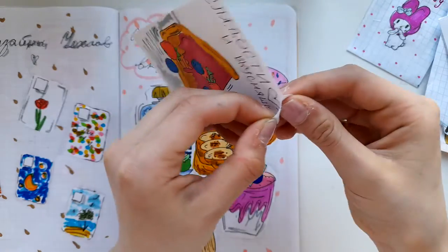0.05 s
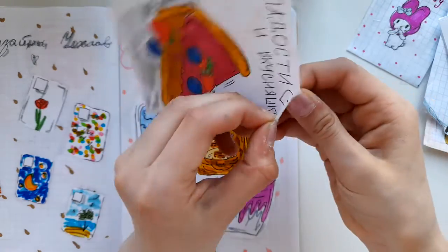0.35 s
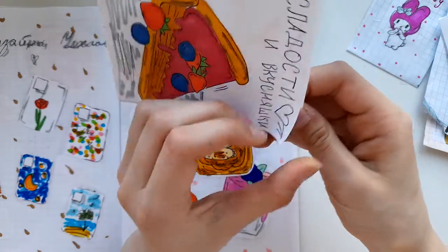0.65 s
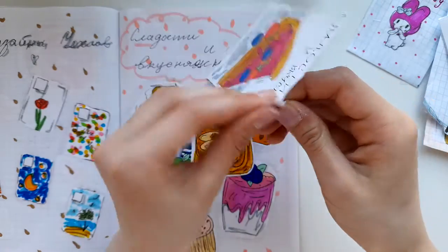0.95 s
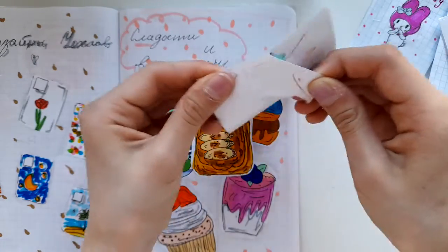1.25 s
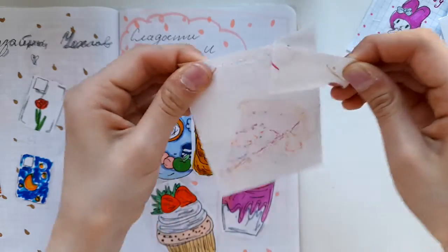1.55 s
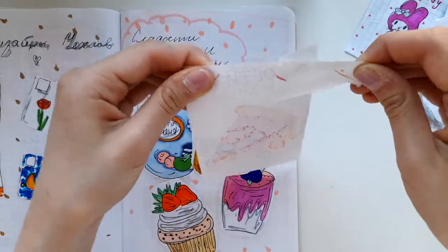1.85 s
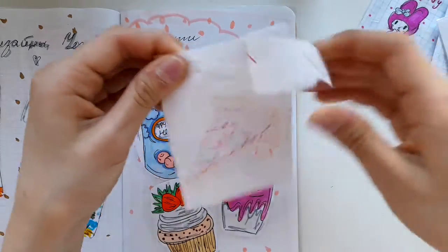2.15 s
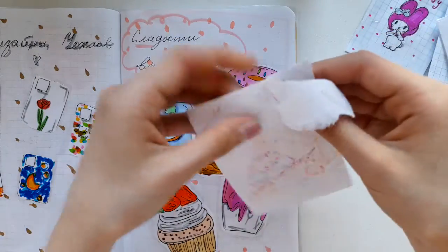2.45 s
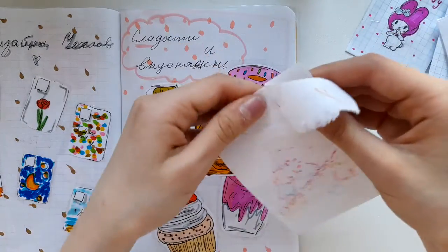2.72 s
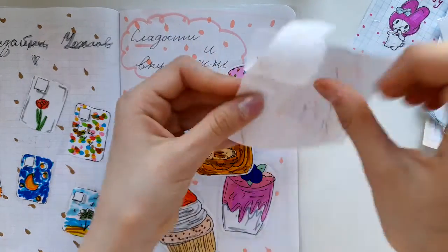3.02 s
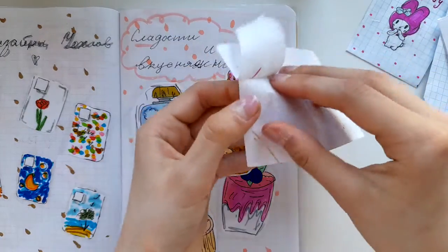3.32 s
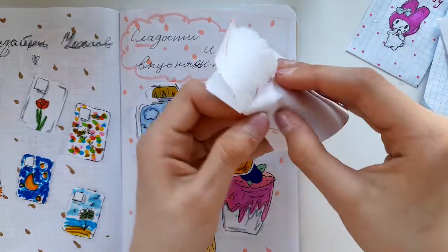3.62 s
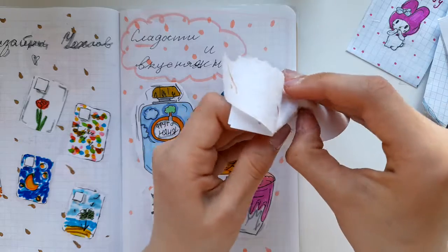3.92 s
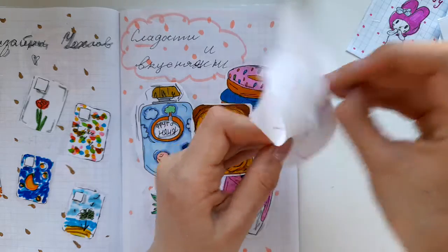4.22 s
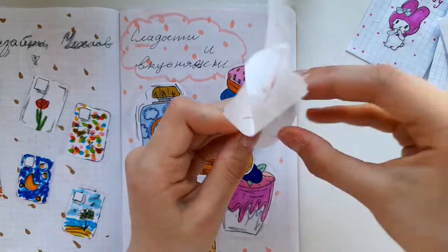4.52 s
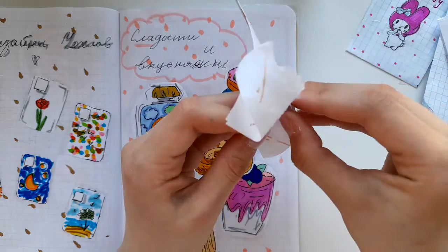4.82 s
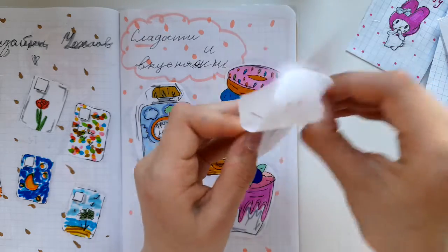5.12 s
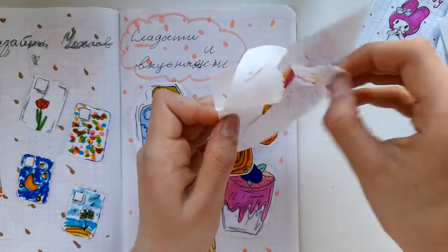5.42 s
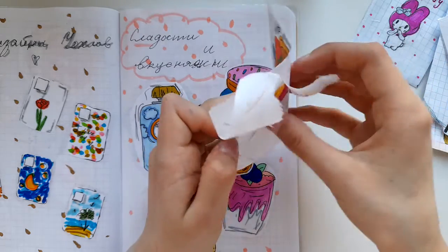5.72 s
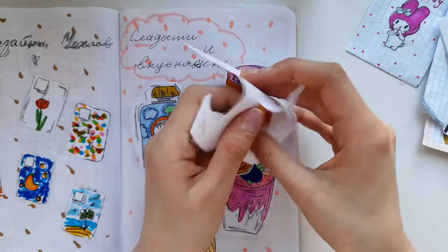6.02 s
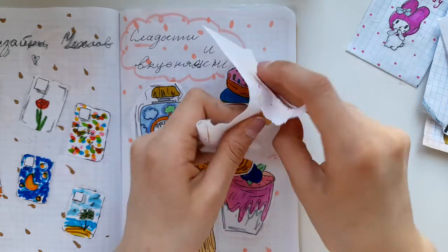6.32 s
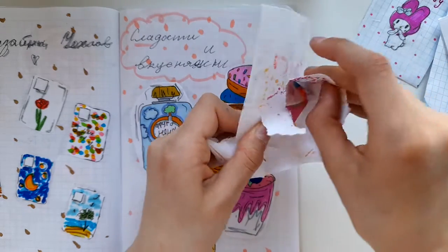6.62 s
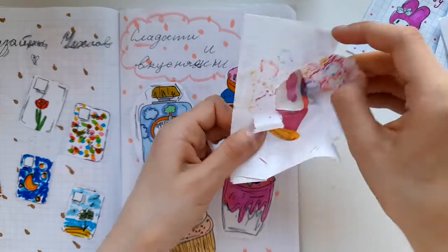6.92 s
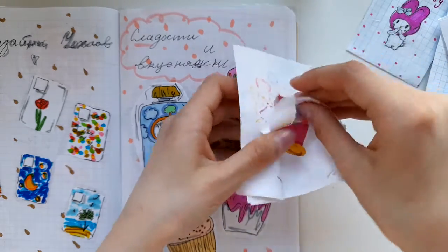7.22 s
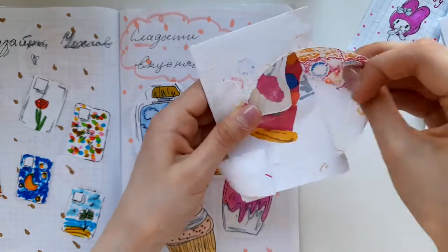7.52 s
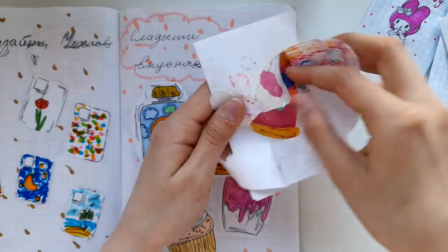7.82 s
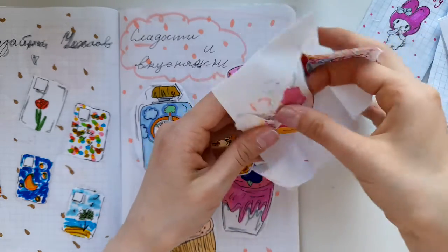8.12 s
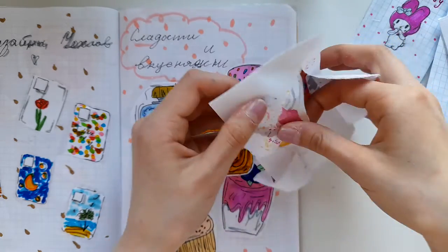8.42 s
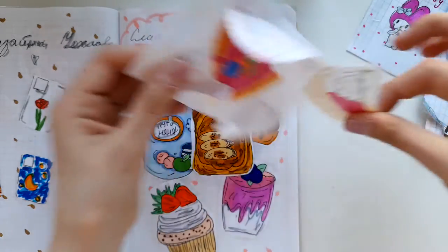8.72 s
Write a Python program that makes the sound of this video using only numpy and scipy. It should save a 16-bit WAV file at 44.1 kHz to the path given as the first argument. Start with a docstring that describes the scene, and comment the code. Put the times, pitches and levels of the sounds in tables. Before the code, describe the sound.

Thin paper is torn open by hand, close to the microphone in a small, quiet room. Light rubbing and a small rip at about 0.4 seconds lead into a run of crisp, bright rips from 1 to 1.5 seconds, trailing off in little tears and ticks by 2 seconds. From 2 to 5 seconds the paper is handled more quietly, with finger rubs, scattered crease snaps and small pops, and soft bumps on the desk around 4.2 and 4.7 seconds. A sharp rip comes just after 5 seconds, followed by light rustling. From 6.5 to 7 seconds several short tears mix with scrapes and crackling creases. Another rip sounds at 7.5 seconds and a sharp snap near 7.9. Rubbing and crinkling continue to about 8.8 seconds, ending with a faint desk bump.

```python
"""A folded paper packet is torn open by two hands over a desk, close to a phone in a small room.
Each rip is a run of breaking fibres. In between, fingers and layers rub, dragged edges scrape,
single fibres tick, creases buckle with sharp snaps and curved panels pop inside out.
Rips, rubs and snaps ring the same sheet in three colours: bright hiss, ringing folds and low body.
Underneath, loose flaps push air and now and then a hand bumps the desk."""
import sys
import numpy as np
from scipy import signal
from scipy.fft import rfft, irfft
from scipy.io import wavfile
from scipy.ndimage import uniform_filter1d

SR = 44100
rng = np.random.default_rng(int(sys.argv[2]) if len(sys.argv) > 2 else 0)


def generate_wav(signal):
    """Clip the signal to [-1, 1] and save it as 16-bit WAV at the path in sys.argv[1]."""
    frames = np.transpose(np.atleast_2d(signal))
    scaled = np.clip(frames, -1, 1) * 32767
    pcm = np.round(scaled).astype(np.int16)
    wavfile.write(sys.argv[1], SR, pcm)


N = 390680
TIME = np.arange(N) / SR

# The three colours of the paper, each a spectrum: f/Hz, level/dB
HISS_SPECTRUM = [(4500, -14.5), (6500, -11), (8300, -6), (9700, -1.5), (11500, -3), (14500, -5),
                 (16000, -25), (18000, -31)]
FOLDS_SPECTRUM = [(2000, -25), (2900, -2.5), (3500, 3), (4700, 2), (6300, -1), (8000, -14.5)]
BODY_SPECTRUM = [(50, -30), (150, -12), (650, -10), (880, -3), (1250, 1.5), (1550, -2.5), (1880, -7),
                 (2200, -0.5), (2800, -10), (4000, -25)]
# The quiet of the room: f/Hz, level/dB
ROOM_TONE_SPECTRUM = [(25, -26.5), (60, -0.5), (200, -1), (500, -6.5), (1500, -35), (16000, -24)]

# Cue levels are set ahead of the mix; folds and body are relative to the hiss.
# The grip on the packet, which never quite stops sliding: t/s, hiss/dB, body/dB
GRIP = [(0, -60.5, -9), (.3, -63, -16), (.6, -68, -12.5), (1.6, -66, 1), (2.1, -71.5, -14.5),
        (3.08, -64.5, -23), (3.3, -59.5, -10), (3.799, -61, -8), (3.94, -71, -21.5), (4.451, -87, -10),
        (4.72, -61.5, -7.5), (5.1, -54, -15), (5.43, -73.5, -7), (5.8, -58, -8.5), (7.4, -50, -7),
        (7.66, -62, -2.5), (8.05, -56.5, -3), (8.45, -52.5, -9), (8.56, -63.5, -5)]
# Strokes of a finger or a layer over the sheet: t/s, length/s, hiss/dB, body/dB
RUBS = [(0.06, 0.053, -72, 14), (0.256, 0.14, -52.5, -18), (0.922, 0.18, -50.5, -42),
        (1.733, 0.06, -53.5, -18.5), (1.955, 0.072, -50, -23.5), (2.145, 0.097, -57.5, -7),
        (2.226, 0.11, -48, -17), (2.348, 0.13, -47.5, -11.5), (2.477, 0.095, -53, -8.5),
        (2.596, 0.055, -50.5, -16), (2.725, 0.18, -53.5, -17), (2.85, 0.15, -52.5, -13.5),
        (3.123, 0.16, -54.5, -9.5), (3.3, 0.14, -56.5, -9), (3.646, 0.099, -51.5, -7.5),
        (3.993, 0.097, -53, -11), (4.131, 0.037, -50.5, -10), (4.177, 0.046, -49, -4.5),
        (4.5, 0.054, -67, -3), (4.639, 0.13, -70.5, 11), (4.896, 0.014, -43, -16), (5.647, 0.019, -48, -15),
        (5.67, 0.18, -55.5, -6.5), (5.805, 0.15, -47, -10.5), (6.079, 0.087, -51, -9),
        (6.22, 0.074, -48, -5.5), (6.362, 0.061, -45.5, -19), (6.838, 0.063, -44.5, -3),
        (6.99, 0.058, -47.5, -4), (7.712, 0.18, -52, -6), (8.012, 0.19, -47.5, -5),
        (8.38, 0.019, -43.5, -7.5), (8.619, 0.12, -45.5, -12)]
# An edge or fingertip dragged over a flap: t/s, length/s, first f/Hz, last f/Hz, level/dB
SCRAPES = [(0.07, .08, 1600, 900, -64), (1.005, 0.2, 1200, 1300, -60.5), (1.215, 0.098, 1350, 1249, -48),
           (1.426, 0.07, 1350, 1240, -46), (1.443, .05, 4400, 4100, -38), (2.245, 0.055, 563, 560, -59),
           (4.557, 0.15, 1850, 1680, -68.5), (5.151, .055, 9600, 10100, -31),
           (6.486, 0.12, 1200, 1508, -48), (6.53, 0.063, 3700, 3930, -32), (6.746, .088, 4900, 3196, -32.5),
           (7.013, 0.15, 1350, 1263, -69), (7.224, .17, 1450, 1310, -62), (7.491, 0.072, 1250, 1193, -44),
           (7.797, .06, 1450, 1300, -54), (7.971, 0.22, 1300, 1210, -63.5), (8.683, 0.084, 922, 926, -64.5)]
# Hands bumping the desk: t/s, level/dB, decay/s
BUMPS = [(.085, -59, 0.07), (4.215, -45, 0.046), (4.68, -48.5, 0.073), (5.235, -56, 0.048),
         (8.783, -47, 0.035)]
# Resonances of the desk top: f/Hz, width/Hz, level/dB
DESK_MODES = [(97.2, 6.9, 2), (144, 31, -1), (260, 16.4, -1.5), (528, 65, -10)]
# Single stiff fibres letting go: t/s, hiss/dB
TICKS = [(.231, -49.5), (.325, -48), (.3713, -31.5), (.459, -49), (.859, -44), (.8912, -42.5),
         (.9167, -37.5), (1.0258, -32), (1.182, -34), (1.2003, -23.5), (1.249, -22), (1.6307, -40),
         (1.652, -39), (1.713, -37.5), (1.831, -34), (1.928, -38), (3.896, -48.5), (4.084, -41),
         (4.138, -42.5), (4.792, -43.5), (4.8977, -40.5), (4.923, -47), (4.991, -45.5), (5.0473, -41),
         (5.0555, -41), (5.078, -46), (5.1155, -41), (5.1197, -28), (6.4585, -35.5), (6.473, -35)]
# Rips, one for each pull: t/s, rise/s, hold/s, hiss/dB, folds/dB, body/dB
RIPS = [(0.346, 0.033, 0.034, -31.5, -9, -20), (0.471, 0.0096, 0.0053, -35, -10, -13.5),
        (1.02, 0.071, 0.022, -27, -15, -29), (1.122, 0.014, 0.088, -35, -11, -23),
        (1.189, 0.057, 0.046, -21, -7.5, -18.5), (1.39, 0.018, 0.021, -33.5, -6, -8.5),
        (1.419, 0.024, 0.036, -20.5, -9.5, -16), (1.646, 0.024, 0.052, -40, -13.5, -15.5),
        (1.817, 0.0098, 0.011, -33.5, -12, -15.5), (1.907, 0.022, 0.017, -39, -13.5, -16),
        (5.097, 0.021, .02, -37, -3, -11), (5.139, 0.0032, 0.075, -19, -8, -15.5),
        (5.204, 0.023, 0.043, -25, -9, -16.5), (6.48, 0.016, 0.085, -32.5, -8.5, -20.5),
        (6.52, 0.033, 0.029, -25, -4, -10), (6.634, 0.014, 0.0086, -37, 0.5, -4),
        (6.686, 0.013, 0.013, -26.5, 1.5, -8), (6.734, 0.013, 0.008, -29, -1.5, -5.5),
        (6.774, 0.023, 0.028, -27, -5, -8), (6.893, 0.02, 0.025, -30.5, -0.5, -4.5),
        (7.453, 0.0086, 0.03, -33.5, -4.5, -8), (7.484, 0.028, 0.022, -19, -6.5, -8.5)]
# The loose sheet flapping: t/s, level/dB, decay/s
FLAPS = [(.425, -62, 0.21), (1.27, -57, 0.079), (1.44, -47.5, 0.1), (1.484, -41.5, 0.017),
         (2.32, -60, 0.06), (2.386, -57, 0.033), (3.166, -50, 0.023), (3.211, -56, 0.035),
         (5.146, -50.5, 0.17), (5.244, -51, 0.045), (6.55, -56.5, 0.084), (7.515, -49, 0.06)]
# The puff of air from a flap: f/Hz, level/dB
PUFF_SPECTRUM = [(40, -27.5), (110, -10), (170, -5), (290, -9.5), (560, -13), (1500, -22)]
# Creases buckling and edges giving way: t/s, hiss/dB, folds/dB, body/dB, flip time/s
SNAPS = [(1.5, -19, -9, -19, 0.0022), (2.163, -42, -5, -10, 0.0062), (2.319, -35.5, -8, -13, 0.0044),
         (3.166, -45.5, 9.5, 8, 0.0017), (3.1713, -51, 4, 12, 0.00061),
         (3.2119, -53.5, 15.5, 15.5, 0.00035), (4.2187, -28, -3, -5, .002), (5.022, -34, -6.5, -15, 0.0023),
         (5.103, -33.5, -6, -19, 0.0028), (5.1412, -21, -3.5, -6.5, 0.0061),
         (5.249, -26, -12, -3.5, 0.0024), (5.57, -47, 2, 1, .002), (6.0746, -48, -6, 0.5, .001),
         (6.156, -40.5, -1, -14, .002), (6.513, -25, -5.5, -6, .003), (6.537, -20, -8, -7.5, .004),
         (6.6903, -27.5, -3, -9.5, 0.0024), (6.9107, -20, -2, -18, 0.0024), (6.9182, -26, -2, -10, 0.0016),
         (7.3073, -24.5, -7, -16.5, 0.00048), (7.399, -35.5, -1.5, -4, 0.00097),
         (7.457, -33, -8, -10, 0.0016), (7.4884, -25, -14, -9, 0.0025), (7.559, -20.5, -6, 3.5, 0.00085),
         (7.8603, -15.5, -2.5, -8, 0.00057), (8.2415, -43.5, 4, -21, 0.00036), (8.263, -42, 1, -32, .0005),
         (8.3275, -39, 2, 1, 0.0014), (8.695, -30.5, -6, -13.5, 0.0047), (8.738, -36, -0.5, 0, 0.0038)]
# Curved panels popping inside out, lower when larger: t/s, f/Hz, level/dB
POPS = [(2.239, 1130, -55), (2.251, 920, -44.5), (2.387, 1550, -39.5), (2.8652, 1320, -44.5),
        (3.597, 875, -44), (3.653, 905, -48.5), (5.539, 1220, -45.5), (5.598, 1280, -50),
        (5.745, 1550, -41), (5.961, 1330, -43), (6.315, 3330, -39), (6.3411, 2660, -30.5),
        (7.8595, 1600, -23.5), (8.478, 1300, -44)]
# Spectrum of a popping panel: multiple of its pitch, level/dB
PANEL_SPECTRUM = [(.25, -24.5), (.55, -10), (1, 1), (1.75, -11), (3, -17), (9, -31)]


def undb(db):
    """Decibels to gain."""
    return 10 ** (np.asarray(db) / 20)


def unit(x):
    """Scale to rms 1."""
    return x / np.sqrt(np.mean(x ** 2))


def add(out, start, sound):
    """Mix a sound in at a start time in seconds."""
    i = max(int(start * SR), 0)
    out[..., i:i + sound.shape[-1]] += sound[..., :N - i]


def response(points, size=1024):
    """Minimum-phase impulse response of unit energy from a spectrum of (f/Hz, level/dB) points."""
    hz, db = np.transpose(points)
    log_hz = np.log(np.arange(size // 2 + 1) * SR / size + 1)
    curve_db = np.interp(log_hz, np.log(hz), db, left=db[0] - 21.5, right=db[-1] - 13.5)
    cepstrum = irfft(np.log(undb(curve_db)))
    cepstrum[1:size // 2] *= 2
    cepstrum[size // 2 + 1:] = 0
    impulse = irfft(np.exp(rfft(cepstrum)))
    return impulse[None] / np.linalg.norm(impulse)


def ring(x, impulse):
    """Pass two channels through an impulse response."""
    return signal.oaconvolve(x, impulse, axes=1)[:, :x.shape[1]]


def stereo_noise(size, likeness):
    """White noise whose left and right correlate by likeness."""
    noise = rng.standard_normal((3, size))
    return np.sqrt(likeness) * noise[0] + np.sqrt(1 - likeness) * noise[1:]


def burst(envelope, impulse, likeness, db, length_s=0.0027):
    """A short noise hit through a response; db is its rms if packed into length_s."""
    hit = ring(stereo_noise(len(envelope), likeness) * envelope, impulse)
    return unit(hit) * undb(db) * np.sqrt(length_s * SR / len(envelope))


def wobble(t, rate):
    """Random values, rate of them a second, joined by straight lines."""
    values = rng.standard_normal(len(t))
    return np.interp((t - t[0]) * rate, np.arange(len(t)), values)


def gesture_db(t, rise_s, hold_s, sag_db_per_s, release_db_per_s):
    """Envelope of one hand movement: it gathers speed, sags while it lasts and dies away."""
    speed = np.clip(t / rise_s, .001, 1)
    sag_db = sag_db_per_s * np.clip(t - rise_s, 0, hold_s)
    release_db = release_db_per_s * np.maximum(t - rise_s - hold_s, 0)
    return 20 * np.log10(speed) - sag_db - release_db


def crackle(rate, spread_db, grain_s, smooth, even_s):
    """Envelope of tiny slips at random moments, few large and many small, over a smooth share."""
    size = len(rate)
    slips = rng.random(size) < rate / SR
    strength = undb(spread_db * np.minimum(rng.exponential(size=size), 5))
    energy = signal.lfilter([1], [1, -np.exp(-1 / (grain_s * SR))], slips * strength ** 2)
    # the hands feed in energy steadily, however it is shared among the slips
    energy /= np.abs(uniform_filter1d(energy, int(even_s * SR))) + 1e-6
    return np.sqrt(smooth + (1 - smooth) * energy)


def morph(x, new_response, shape_s=.07):
    """Pass a sound through a response that crossfades into a new shape every shape_s."""
    hop = int(shape_s * SR)
    fade = signal.get_window("hann", 2 * hop)
    padded = np.pad(x, ((0, 0), (hop, 3 * hop)))
    out = np.zeros((2, padded.shape[1] + SR))
    for i in range(0, x.shape[1] + hop, hop):
        part = signal.fftconvolve(padded[:, i:i + 2 * hop] * fade, new_response(), axes=1)
        out[:, i:i + part.shape[1]] += part
    return out[:, hop:hop + x.shape[1]]


def sheet():
    """Each colour as (spectrum, detune spread/semitones, likeness): lows reach both sides alike."""
    return [(HISS_SPECTRUM, .3, .25), (FOLDS_SPECTRUM, 1.38, .35), (BODY_SPECTRUM, 0.13, .88)]


def bent(spectrum, semitones):
    """Response of one colour of the sheet, detuned at random by bending."""
    stretch = 2 ** (semitones * rng.standard_normal() / 12)
    return response([(hz * stretch, db) for hz, db in spectrum])


def drive_sheet(envelopes_db, t, grains, paper, jerk_db, jerk_rate):
    """Grains ring hiss, folds and body; the hands move in jerks and the sheet keeps changing shape."""
    hiss_db, folds_db, body_db = (db + jerk_db * wobble(t, jerk_rate) for db in envelopes_db)
    levels_db = hiss_db, hiss_db + folds_db, hiss_db + body_db
    out = np.zeros((2, len(t)))
    for db, (spectrum, semitones, likeness) in zip(levels_db, paper):
        friction = stereo_noise(len(t), likeness) * grains * undb(db)
        out += morph(friction, lambda: bent(spectrum, semitones))
    return out


def thuds(cues, impulse, rise_share, size):
    """Soft pushes through a low response; the longer a push lasts, the more gently it swells."""
    out, t = np.zeros((2, N)), np.arange(size) / SR
    for start, db, decay_s in cues:
        attack = 1 - np.exp(-t / (rise_share * decay_s))
        decay = np.exp(-.5 * (t / decay_s) ** 2) * (1 - t / t[-1])
        thud = ring(stereo_noise(size, 0.83) * attack * decay, impulse)
        add(out, start, unit(thud) * undb(db) * np.sqrt(decay_s * SR / size))
    return out


def room_tone(level_db=-77):
    """The quiet of the room: a faint, steady bed of low noise."""
    return undb(level_db) * ring(stereo_noise(N, 0.53), response(ROOM_TONE_SPECTRUM, size=4096))


def rub_envelopes(rise_share=0.55):
    """Hiss/dB and relative body/dB of the sliding grip and all the strokes together."""
    times, *columns = np.transpose(GRIP)
    grip_db, grip_body_db = (np.interp(TIME, times, column) for column in columns)
    power = undb([grip_db, grip_db + grip_body_db]) ** 2
    t = TIME[:SR // 2]
    for start, length_s, db, body_db in RUBS:
        rise_s = rise_share * length_s
        hiss_db = db + gesture_db(t, rise_s, length_s - rise_s, sag_db_per_s=15.5, release_db_per_s=405.5)
        add(power, start, undb([hiss_db, hiss_db + body_db]) ** 2)
    return 10 * np.log10([power[0], power[1] / power[0]])


def rubbing(paper, slip_rate=500, folds_offset_db=-1, folds_per_body=0.48):
    """Skin and paper slide with a soft hiss, catching in small ticks."""
    hiss_db, body_db = rub_envelopes()
    # the more of the sheet is free to move, the more its folds ring too
    folds_db = folds_offset_db + folds_per_body * body_db
    grains = crackle(np.full(N, slip_rate), spread_db=2.6, grain_s=0.0012, smooth=0.46, even_s=0.16)
    return drive_sheet((hiss_db, folds_db, body_db), TIME, grains, paper, jerk_db=2.5, jerk_rate=45)


def scraping(slip_rate=600, swell_power=0.24, half_width_hz=216):
    """Uneven slips drive one broad resonance of a flap; its note glides with the flap's free length."""
    out = np.zeros((2, N))
    for start, length_s, first_hz, last_hz, db in SCRAPES:
        size = int(length_s * SR)
        likeness = np.interp(first_hz, [1500, 3500], [.9, .35])
        rate = np.full(size, slip_rate)
        grains = crackle(rate, spread_db=5.0, grain_s=0.00055, smooth=0.2, even_s=0.031)
        slips = grains * (stereo_noise(size, likeness) + 1j * stereo_noise(size, likeness))
        cutoff_hz = half_width_hz * np.sqrt(first_hz / 1000)  # higher notes are broader
        drive = signal.sosfilt(signal.butter(2, cutoff_hz, fs=SR, output="sos"), slips)
        glide_hz = np.geomspace(first_hz, last_hz, size)
        note = np.real(drive * np.exp(2j * np.pi * np.cumsum(glide_hz) / SR))
        swell = np.sin(np.pi * np.arange(size) / size) ** swell_power
        add(out, start, unit(swell * note) * undb(db))
    return out


def desk_bumps(top_hz=480, size=4096):
    """The desk top rings in a few damped modes; a soft hand excites no treble."""
    t = np.arange(size) / SR
    modes = sum(undb(db) * width * np.exp(-np.pi * width * t) * np.cos(2 * np.pi * hz * t)
                for hz, width, db in DESK_MODES)
    muffled = signal.sosfilt(signal.butter(2, top_hz, fs=SR, output="sos"), modes)
    return thuds(BUMPS, muffled[None], rise_share=0.11, size=16384)


def ticking(paper, break_s=0.00054, size=512):
    """A fibre breaks at once: a pin-sharp click, all hiss, too small to ring the body of the sheet."""
    out, t = np.zeros((2, N)), np.arange(size) / SR
    spectrum, semitones, likeness = paper[0]
    for start, db in TICKS:
        add(out, start, burst(np.exp(-t / break_s), bent(spectrum, semitones), likeness, db))
    return out


def tearing(paper, fibre_rate=620, db_per_doubling=6, coarser_per_body=.7, size=13000):
    """Fibres break one by one; a faster rip is louder and denser, a slack sheet tears more coarsely."""
    out, t = np.zeros((2, N)), np.arange(size) / SR
    for start, rise_s, hold_s, db, folds_db, body_db in RIPS:
        hiss_db = db + gesture_db(t, rise_s, hold_s, sag_db_per_s=53.5, release_db_per_s=498.5)
        rate = fibre_rate * 2 ** ((hiss_db + 29.5 - coarser_per_body * body_db) / db_per_doubling)
        grains = crackle(rate, spread_db=2.6, grain_s=0.00026, smooth=0.08, even_s=0.013)
        rip = drive_sheet((hiss_db, folds_db, body_db), t, grains, paper, jerk_db=0.63, jerk_rate=151.4)
        add(out, start, rip)
    return out


def flapping():
    """The loose sheet pushes air in soft, low puffs."""
    return thuds(FLAPS, response(PUFF_SPECTRUM), rise_share=.06, size=6144)


def snapping(paper, flutter_s=0.0018, flutter_db=-17, size=1024):
    """A crease flips with a crack, slower when it is slack, and the sheet flutters for a moment."""
    out, t = np.zeros((2, N)), np.arange(size) / SR
    for start, hiss_db, folds_db, body_db, flip_s in SNAPS:
        crack = np.exp(-t / flip_s) + undb(flutter_db) * np.exp(-t / flutter_s)
        pan_db = rng.normal(-0.5, 2)  # left minus right
        pan = undb([[pan_db / 2], [-pan_db / 2]])
        for db, (spectrum, semitones, likeness) in zip((0, folds_db, body_db), paper):
            add(out, start, pan * burst(crack, bent(spectrum, semitones), likeness, hiss_db + db))
    return out


def popping(push_s=0.0021, flutter_s=0.0016, flutter_db=-2, size=1024):
    """A whole panel flips with one soft push at its own pitch, then trembles."""
    out, t = np.zeros((2, N)), np.arange(size) / SR
    for start, hz, db in POPS:
        panel = response([(multiple * hz, gain_db) for multiple, gain_db in PANEL_SPECTRUM])
        push = panel * undb(db) * np.sqrt(push_s * SR)
        tremble = burst(np.exp(-t / flutter_s), panel, likeness=1, db=db + flutter_db)
        add(out, start, push + tremble)
    return out


def room(x, scatter_s=0.0021, scatter_db=-3.5, t60_s=0.19, tail_db=-7, size=16384, early_size=1024):
    """Desk and moving hands scatter the sound, then the small room adds a short tail."""
    t = np.arange(size) / SR
    early = (np.exp(-t / scatter_s) * (t > .001))[:early_size]
    scattered = morph(x, lambda: unit(stereo_noise(early_size, 0.46) * early) / np.sqrt(early_size))
    tail = stereo_noise(size, 0.24) * undb(-60 * t / t60_s) * (t > scatter_s)
    reverb = ring(x, unit(tail) / np.sqrt(size))
    direct = np.array([x[0], np.roll(x[1], 2)])  # the left microphone is slightly nearer
    return direct + undb(scatter_db) * scattered + undb(tail_db) * reverb


def scene(tear_db=-3.0, rub_db=-1, snap_db=-0.85):
    """The mix: crisp paper through the room, with dry low thuds and room tone underneath."""
    paper = sheet()
    crisp = undb(tear_db) * tearing(paper) + ticking(paper) + scraping() + popping()
    crisp += undb(rub_db) * rubbing(paper) + undb(snap_db) * snapping(paper)
    dull = flapping() + desk_bumps()
    return room(crisp) + dull + room_tone()


def record(dry, top_hz=16300):
    """The phone clips at full scale and cuts the top end steeply."""
    high_cut = signal.ellip(10, .2, 75, top_hz, fs=SR, output="sos")
    return signal.sosfilt(high_cut, np.clip(dry, -1, 1))


dry = scene()
out = record(dry)
generate_wav(out)
```